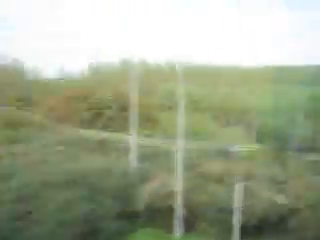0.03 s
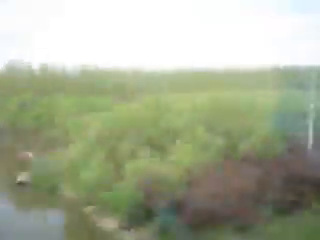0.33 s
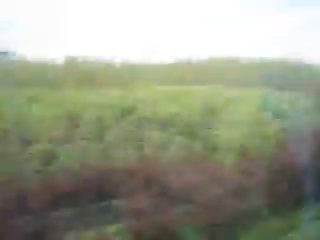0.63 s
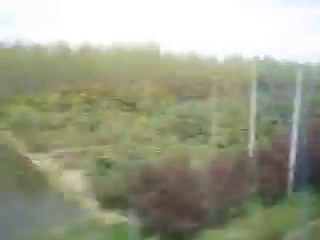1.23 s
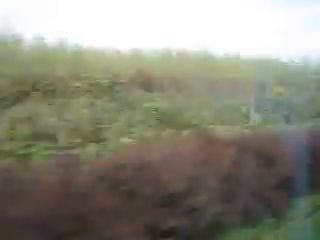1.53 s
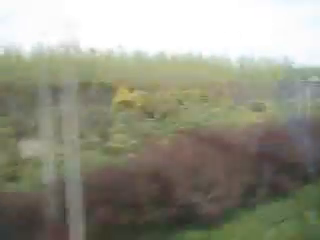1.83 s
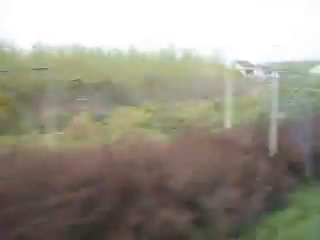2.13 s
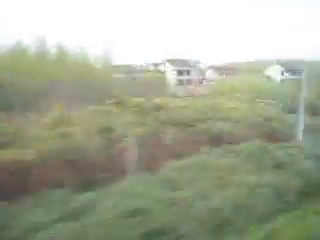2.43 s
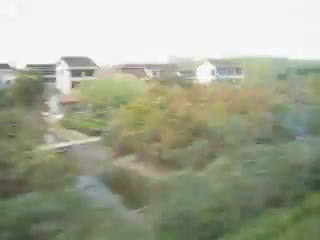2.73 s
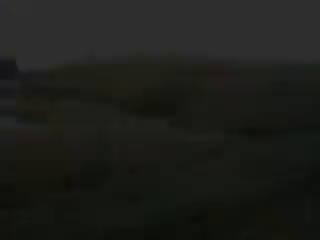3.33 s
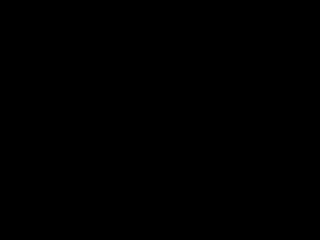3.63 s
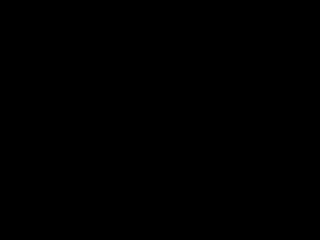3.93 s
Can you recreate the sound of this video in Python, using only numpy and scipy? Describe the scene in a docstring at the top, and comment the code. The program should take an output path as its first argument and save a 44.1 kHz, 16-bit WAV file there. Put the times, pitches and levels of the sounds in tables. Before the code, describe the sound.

A fast train runs at steady speed, heard from a seat inside the carriage. From the start, a deep rumble swells and eases under rushing wheels and air, with a faint wavering whine. The deepest swings make the microphone flutter and crackle softly. Light ticks and rubs of loose trim come throughout, clustering around 3 to 3.4 seconds. The sound cuts off abruptly at about 3.6 seconds.

```python
"""A deep, swelling boom under the rush of wheels and air: a high-speed train at steady speed, heard from
a seat inside the carriage. The body hums, the wall panels drone, the drive whines faintly, and loose
trim ticks and chafes around the cabin. The deepest swings overload the microphone input, which
flutters and crackles softly. The sound cuts off shortly before the end."""
import sys
import numpy as np
from scipy import signal
from scipy.fft import rfft, irfft
from scipy.io import wavfile
from scipy.ndimage import uniform_filter1d

SR = 44100
rng = np.random.default_rng(int(sys.argv[2]) if len(sys.argv) > 2 else 0)


def to_wav(sig):
    """Store sig (one row per channel, or 1-D mono) as 16-bit WAV at the path in sys.argv[1].

    Samples outside -1..1 are clipped; the rate is SR.
    """
    pcm = np.clip(np.atleast_2d(sig), -1, 1) * 32767
    pcm = np.round(pcm).astype(np.int16)
    wavfile.write(sys.argv[1], SR, pcm.T)  # frames by channels


N = 176400

# Levels are those at the seat, ahead of the microphone's overload and tone filter.
# soft, bright rustles in the cabin: middle_s, length_s, level_db
CABIN_RUSTLES = [(.28, .14, -64), (1.657, .14, -62), (3.057, .1, -64), (3.43, .08, -68)]
# panels rubbing: middle_s, length_s, pitch_hz, level_db, width_hz, glide_hz_per_s
PANEL_CHAFES = [(0.308, 0.037, 4400, -52, 400, -3), (1.005, 0.041, 3420, -48.5, 350, 0),
                (1.125, .025, 3430, -48.5, 503, -4), (1.8, 0.023, 3400, -51, 350, 2),
                (1.847, .03, 3400, -49, 350, 2), (2.13, .051, 3220, -53, 900, 2),
                (2.935, 0.026, 3900, -49, 480, 2), (3.076, 0.023, 3720, -48.5, 420, 7997),
                (3.187, 0.024, 1980, -40, 600, 3995), (3.195, 0.074, 2500, -48.5, 1500, -1.5),
                (3.253, .04, 4180, -62, 399, 0), (3.364, 0.068, 2300, -47.5, 1000, -1)]
# ticks of loose trim: start_s, level_db, brightness_db_per_octave
TRIM_TICKS = [(0.059, -48.5, 0), (.757, -50.5, 0), (.842, -54, -5), (.921, -52, -2), (1.152, -49, -3),
              (1.452, -47, -1), (1.813, -50, 1), (1.842, -52.5, -8), (2.178, -64, 0), (2.417, -49.5, 0),
              (2.684, -56, -7), (2.751, -53.5, 4), (2.990, -48, 3), (3.047, -50.5, 4.5), (3.086, -49, 0),
              (3.159, -49.5, -1.5), (3.202, -41, -4), (3.216, -54, 0.5)]
# resonances of that trim: pitch_hz, relative_db, width_hz
TRIM_MODES = [(4050, -1.5, 3900), (5900, 2, 2400), (7770, -3.5, 1000), (10000, -8, 1600)]
# motor tones: pitch_hz, level_db, width_hz
MOTOR_TONES = [(497, -44.5, 5.5), (581.3, -50.5, 8.8), (772, -45, 6), (920.5, -49, 45), (1636, -57, 3.7)]
# strength of the gear tone: time_s, level_db
GEAR_LEVELS = [(0, -42), (.52, -44.5), (.63, -48), (.77, -41.5), (.9, -50.5), (1.0, -39.5), (1.08, -49),
               (1.32, -47), (1.4, -44), (1.6, -50), (1.85, -45.5), (2.13, -47), (2.19, -38.5), (2.25, -55),
               (2.5, -46.5), (2.69, -50.5), (2.84, -42.5), (2.97, -47.5), (3.25, -40.5), (3.5, -48.5),
               (3.6, -37.5)]
# wheels and air, heard through the walls: frequency_hz, density_db
RUSH_SPECTRUM = [(60, -71.5), (190, -53.5), (235, -55), (320, -52.5), (430, -56.5), (560, -56),
                 (690, -63.5), (860, -62), (1050, -68.5), (1230, -65), (1420, -67.5), (1560, -73.5),
                 (2000, -78.5), (2600, -80), (3500, -85), (5000, -91.5), (7000, -100.5), (10000, -108),
                 (13000, -115)]
# boom of the carriage body, before its swell: frequency_hz, density_db
BOOM_SPECTRUM = [(15, -49), (33, -33), (49, -21.5), (64, -25.5), (82, -30.5), (115, -35), (150, -37),
                 (195, -47), (300, -60), (600, -110)]
# swell of that boom: time_s, gain_db
BOOM_SWELL = [(0, 0), (.2, -3), (.31, 0), (.44, -2.5), (.58, 3), (.68, 0), (.76, -5.5), (.92, -2),
              (1.08, -2.5), (1.18, 2), (1.45, -4.5), (1.57, 2), (1.66, -3), (1.74, -2.5), (1.87, -3.5),
              (1.98, 2), (2.1, -7.5), (2.26, 1.5), (2.4, -5), (2.6, -0.5), (2.75, -4.5), (3.1, 1),
              (3.3, -4), (3.42, -0.5), (3.6, 1.5)]
# strength of the body's hum: time_s, level_db
HUM_LEVELS = [(0, -15), (.12, -19), (.22, -7), (.31, -25), (.42, -27), (.5, -19.5), (.58, -24), (.66, -28),
              (.735, -7), (.82, -21.5), (.95, -26), (1.07, -15), (1.18, -28), (1.37, -14), (1.5, -25),
              (1.62, -22), (1.88, -31), (1.95, -9), (2.02, -19.5), (2.15, -9), (2.25, -23.5), (2.38, -24.5),
              (2.52, -15.5), (2.66, -14.5), (2.83, -14), (2.96, -25.5), (3.03, -12.5), (3.14, -19),
              (3.3, -18), (3.6, -16.5)]
# strength of the wall panels' drone: time_s, level_db
DRONE_LEVELS = [(0, -25.5), (.45, -25), (.56, -21.5), (.7, -29), (1.0, -25), (1.07, -20), (1.15, -27),
                (1.22, -34.5), (1.28, -22.5), (1.41, -27), (1.49, -19), (1.56, -26.5), (1.78, -28),
                (1.86, -18.5), (1.94, -28), (2.0, -24), (2.08, -26.5), (2.15, -20.5), (2.4, -26.5),
                (2.8, -25.5), (2.92, -23), (3.16, -21), (3.26, -24.5), (3.6, -26)]


def amp(db):
    """Decibels to gain."""
    return 10 ** (np.asarray(db) / 20)


def unit(x):
    """Scales to rms 1."""
    return x / np.sqrt(np.mean(x ** 2) + 1e-20)


def envelope(t, levels):
    """Gain that follows rows of time_s, level_db."""
    return amp(np.interp(t, *np.transpose(levels)))


def noise(spectrum):
    """Noise with the given density, joined on a log-frequency axis."""
    points_hz, density_db = np.transpose(spectrum)
    hz = np.fft.rfftfreq(N, 1 / SR)
    gain = amp(np.interp(np.log(hz + 1), np.log(points_hz), density_db))
    return irfft(rfft(rng.standard_normal(N)) * gain, N) * np.sqrt(SR / 2)


def band(centre_hz, width_hz):
    """Noise in one steep resonance, rms 1; the width is taken 6 dB down."""
    detuning = (np.fft.rfftfreq(N, 1 / SR) - centre_hz) / (width_hz / 2)
    return unit(irfft(rfft(rng.standard_normal(N)) / (1 + detuning ** 2), N))


def steadied(x, share=.6, window_s=.05):
    """Evens out a share of the chance fading, as in a vibration that is driven all the time."""
    power = abs(uniform_filter1d(unit(x) ** 2, round(window_s * SR))) + 1e-3
    return x.std() * unit(x / np.sqrt(power) ** share)


def cabin_rustles(t):
    """Faint brushing noises, far in the background."""
    swells = sum(amp(db) * np.exp(-2 * ((t - middle_s) / length_s) ** 2)
                 for middle_s, length_s, db in CABIN_RUSTLES)
    return band(8030, width_hz=6700) * swells


def panel_chafes(t):
    """Cabin panels rub briefly: narrow squeaks, some sliding upwards, and wider scrapes."""
    out = np.zeros(N)
    for middle_s, length_s, hz, db, width_hz, glide in PANEL_CHAFES:
        slide = np.exp(1j * np.pi * glide * (t - middle_s) ** 2)
        rub = (signal.hilbert(band(hz, width_hz)) * slide).real
        out += amp(db) * np.exp(-2 * ((t - middle_s) / length_s) ** 2) * rub
    return out


def trim_ticks(t, rise_s=.002, fall_s=.006):
    """Each tick is a short chatter that rings the same piece of loose trim, duller or brighter."""
    mode_hz, mode_db, _ = np.transpose(TRIM_MODES)
    modes = np.array([band(hz, width_hz) for hz, _, width_hz in TRIM_MODES])
    octaves = np.log2(mode_hz / mode_hz[0])
    out = np.zeros(N)
    for start_s, db, brightness in TRIM_TICKS:
        ring = unit(amp(mode_db + brightness * octaves) @ modes)
        attack = np.clip((t - start_s) / rise_s, 0, 1)
        decay = np.exp(-np.maximum(t - start_s - rise_s, 0) / fall_s)
        out += amp(db) * ring * attack * decay
    return out


def drive_whine(t, gear_hz=1394, waver_hz=3.11):
    """Faint at the seat: narrow wavering motor tones, and a clearer gear tone that comes and goes."""
    pitch_hz = gear_hz + waver_hz * band(0, width_hz=24)
    gear = unit(np.sin(2 * np.pi * np.cumsum(pitch_hz) / SR)) * envelope(t, GEAR_LEVELS)
    motors = sum(amp(db) * steadied(band(hz, width_hz)) for hz, db, width_hz in MOTOR_TONES)
    return gear + motors


def wheel_and_air_rush(patch_db=.5, patch_hz=600, patch_s=.059):
    """Rolling and air noise comes in through the walls, with slightly louder and softer patches."""
    hz, frame_s, spectra = signal.stft(noise(RUSH_SPECTRUM), SR, nperseg=512, noverlap=384)
    patches = uniform_filter1d(rng.standard_normal(spectra.shape), round(patch_hz / hz[1]), axis=0)
    patches = unit(uniform_filter1d(patches, round(patch_s / frame_s[1]), axis=1))
    return signal.istft(spectra * amp(patch_db * patches), SR, nperseg=512, noverlap=384)[1][:N]


def body_rumble(t):
    """All around the seat the body booms and hums and its panels drone, swelling with the track."""
    boom = steadied(noise(BOOM_SPECTRUM)) * envelope(t, BOOM_SWELL)
    hum = steadied(band(115, width_hz=21)) * envelope(t, HUM_LEVELS)
    drone = steadied(band(232, width_hz=110)) * envelope(t, DRONE_LEVELS)
    return boom + hum + drone


def scene():
    """The carriage as it reaches one microphone at a seat."""
    t = np.arange(N) / SR
    running_noise = body_rumble(t) + wheel_and_air_rush() + drive_whine(t)
    return (running_noise + trim_ticks(t) + panel_chafes(t) + cabin_rustles(t))[None]


def record(dry):
    """Big swings hit the microphone input's ceiling with a click and briefly blank the rush."""
    ceiling, catch_s, stop_s = .627, .00006, 3.602
    low_cut_hz, high_cut_hz, edge_hz = 185, 9600, 12600
    t = np.arange(N) / SR
    clipped = np.clip(dry, -ceiling, ceiling)
    time_over_s = t - np.maximum.accumulate(np.where(abs(dry) > ceiling, 0, t), axis=1)
    # the click: a swing overshoots for an instant before the ceiling catches it
    overshoot = (dry - clipped) * np.clip((catch_s - time_over_s) * SR + 1, 0, 1)
    tone_filter = signal.butter(1, [low_cut_hz, high_cut_hz], "band", fs=SR)
    thinned = signal.lfilter(*tone_filter, clipped + overshoot)
    ramp = np.clip(np.minimum(t / .005, (stop_s - t) / .001), 0, 1)  # quick fade in, abrupt stop
    gate = np.sin(np.pi / 2 * ramp) ** 2
    band_limit = signal.firwin(511, edge_hz, window=("kaiser", 9), fs=SR)
    return signal.oaconvolve(thinned * gate, band_limit[None], "same")


dry = scene()
out = record(dry)
to_wav(out)
```